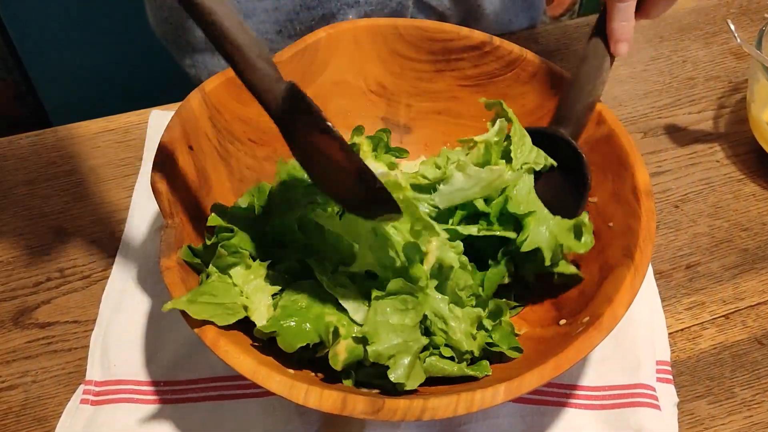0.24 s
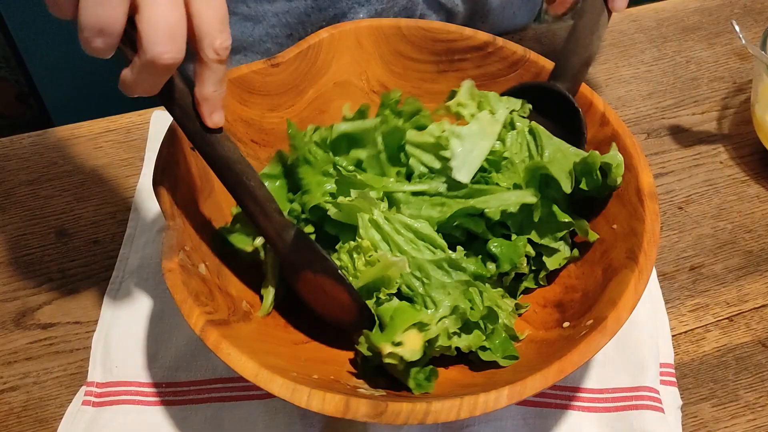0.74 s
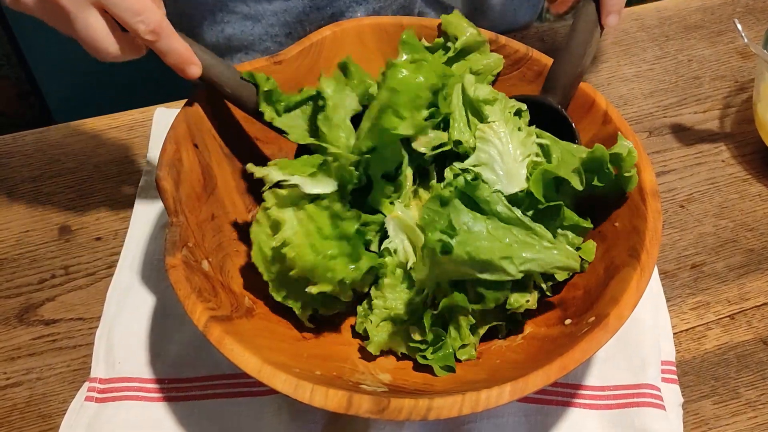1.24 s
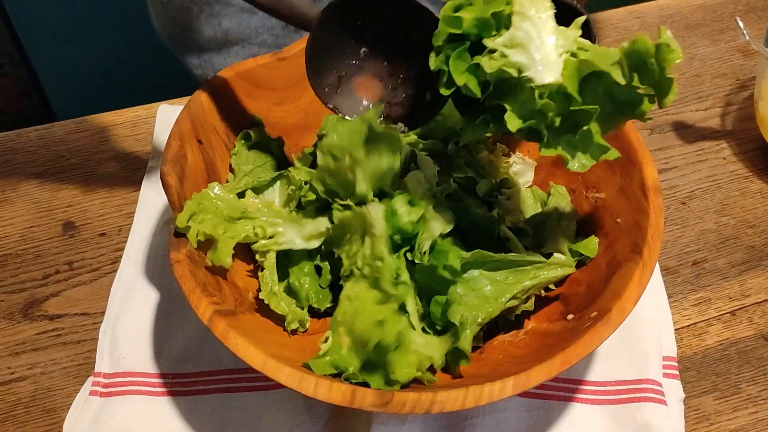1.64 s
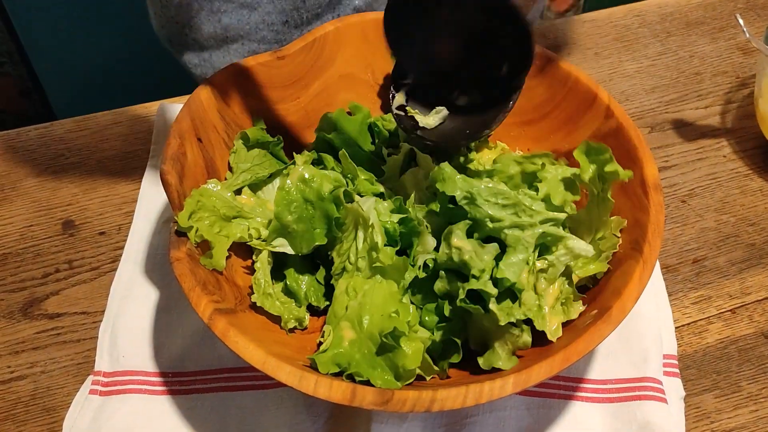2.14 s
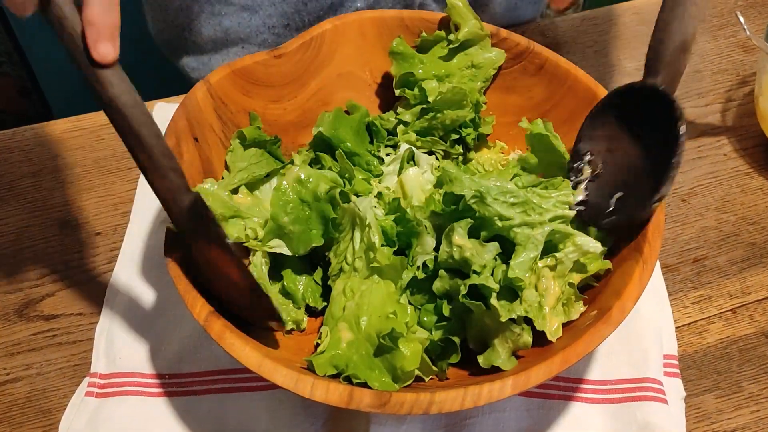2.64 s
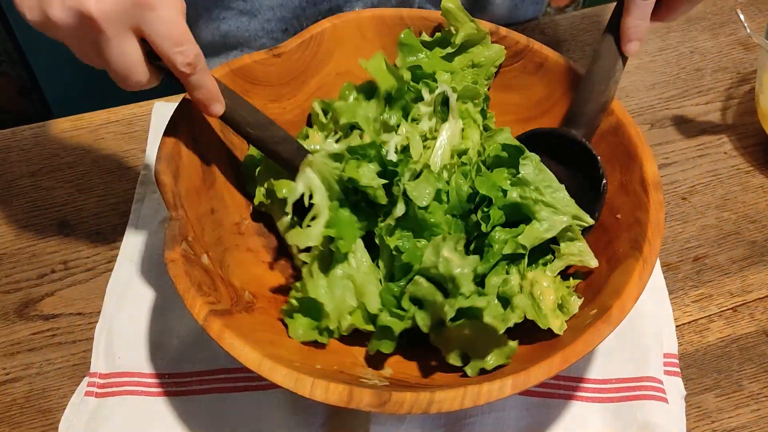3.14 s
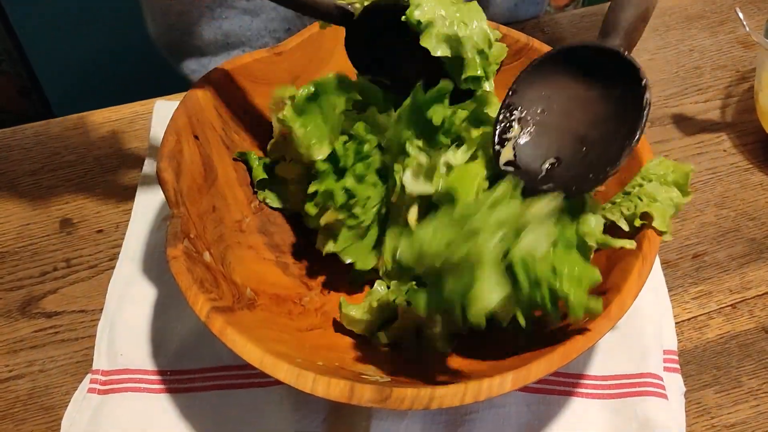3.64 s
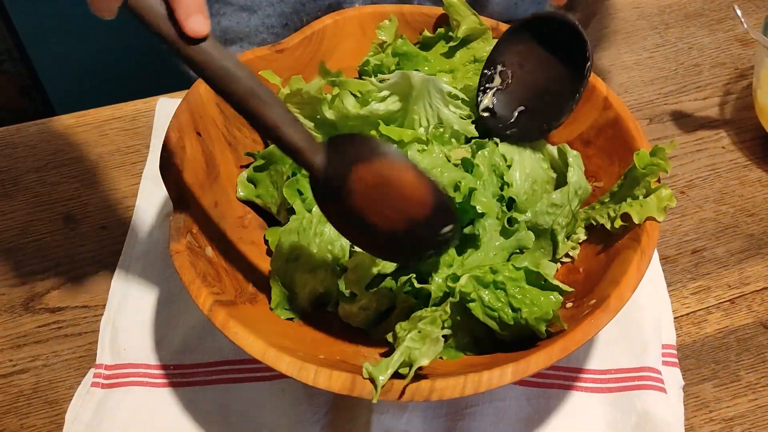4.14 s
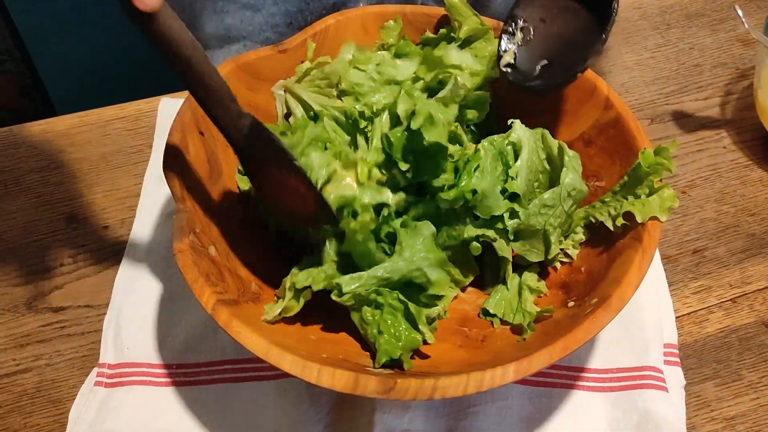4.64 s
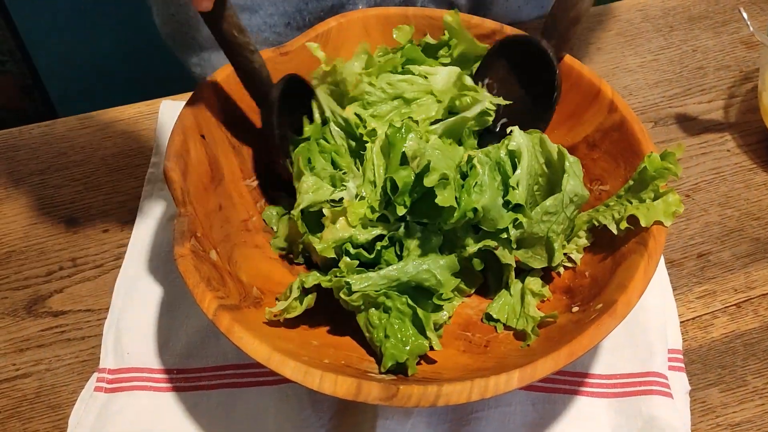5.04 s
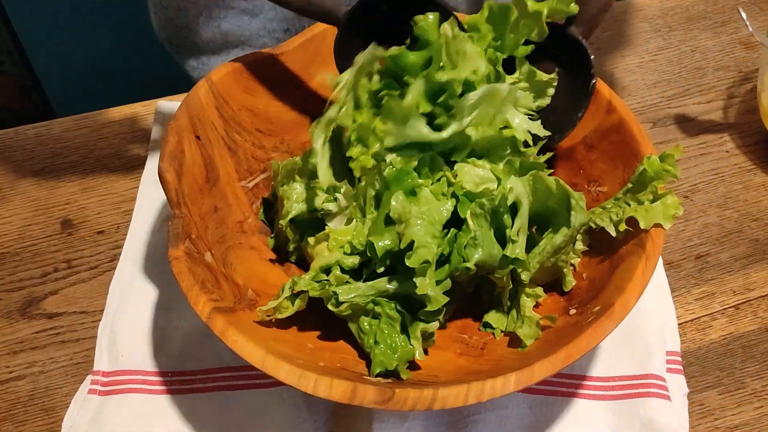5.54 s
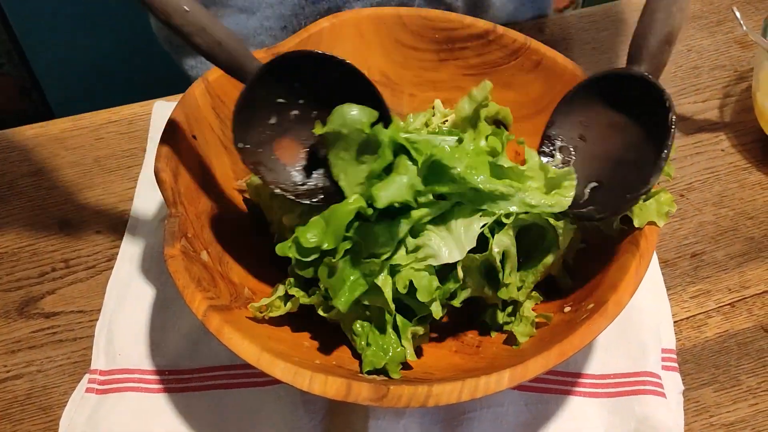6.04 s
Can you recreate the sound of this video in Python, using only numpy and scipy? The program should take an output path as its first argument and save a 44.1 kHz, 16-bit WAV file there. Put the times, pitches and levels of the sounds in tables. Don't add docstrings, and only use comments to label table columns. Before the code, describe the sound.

A quiet kitchen with faint low hum and hiss, heard close in stereo. Wet lettuce rustles very softly from the start, with a small tick near 0.2 s. At 0.63 s a server hits the bowl rim with a loud, bright wooden crack and low boom. Crisp sliding follows at 0.75 s, then tiny leaf snaps and cushioned bumps from 1.0 to 2.0 s. At 2.2 and 2.3 s the servers clap together, sharp and woody. A quick double knock on the bowl wall follows at 2.7 s, more hollow and leftward, trailed by rustling. From 3.0 to 4.7 s only faint ticks and leafy rubs are heard, strongest around 4.5 s. At 4.9 to 5.0 s a loud scoop and skid rattle in rapid succession, with weaker knocks closing the run. Soft rustles, muted bumps and ticks continue to 6.3 s. Knocks leave about half a second of reverberation.

```python
import sys
import numpy as np
from scipy import signal
from scipy.fft import rfft, irfft
from scipy.io import wavfile
from scipy.ndimage import uniform_filter1d

SR = 44100
rng = np.random.default_rng(int(sys.argv[2]) if len(sys.argv) > 2 else 0)


def gain_from_decibels(decibels):
    exponent = np.asarray(decibels, float) / 20
    return 10 ** exponent


def generate_wav(sig):
    pcm = np.round(np.clip(np.atleast_2d(sig).T, -1, 1) * 32767).astype(np.int16)
    wavfile.write(sys.argv[1], SR, pcm)


N = 277830

# mode_hz, width_hz, level_db
BOOM = [(144, 7.6, -11), (206.7, 10, -9), (263.9, 7.3, -5.5), (363, 10, -22.5), (499, 36, -10)]
HALF_BAND = 2 ** .25


def level(x, db):
    return x * gain_from_decibels(db) / np.sqrt(np.mean(x ** 2))


def band(x, lo_hz, hi_hz):
    sos = signal.butter(2, [lo_hz, min(hi_hz, .45 * SR)], "band", fs=SR, output="sos")
    return signal.sosfilt(sos, x)


def on_log(hz, table, axis=1):
    table = np.array(table, float)
    return np.interp(np.log(np.maximum(hz, 1)), np.log(table[:, 0]), table[:, axis])


def ring(modes, seconds, rise_s=0.0018, least_hz=50):
    t = np.arange(int(seconds * SR)) / SR
    y = np.zeros(len(t))
    for k, (hz, width_hz, db) in enumerate(modes):
        width_hz = max(width_hz, least_hz)
        decay = np.exp(-np.pi * width_hz * t)
        sign = (-1) ** k
        y += sign * gain_from_decibels(db) * width_hz * decay * np.sin(2 * np.pi * hz * t)
    y = y * (1 - np.exp(-t / rise_s)) ** 2
    return y / np.abs(y).max()


def crack(lo_hz, hi_hz, decay_s, rise_s=0.000067, snap=0):
    t = np.arange(900) / SR
    envelope = (1 - np.exp(-t / rise_s)) * np.exp(-t / decay_s)
    burst = rng.standard_normal(len(t)) * envelope
    y = band(burst + snap * signal.unit_impulse(len(t)), lo_hz, hi_hz)
    return y / np.abs(y).max()


def add(out, s, y, pan_db, wet_db=0):
    i = int(s * SR)
    y = y[:N - i]
    gains = gain_from_decibels(np.array([pan_db / 2, -pan_db / 2, wet_db]))
    out[:, i:i + len(y)] += np.outer(gains, y)


def walk(rate):
    k = int(SR / rate)
    steps = np.repeat(rng.standard_normal(N // k + 1), k)
    return uniform_filter1d(uniform_filter1d(steps, k), k)[:N]


def knocks():
    knock_s = [.6277, 2.2081, 2.2866, 2.7150, 2.7494, 4.9049, 4.9272, 4.9505, 4.9925]
    # peak_db, contact_crack_db, bowl_boom_db, left_minus_right_db, swell_s
    knock_levels = [
        (-8.5, 8.5, -13.5, -0.5, 0.00086),
        (-7.5, 5.5, -51, 2.5, 0.00047),
        (-5, -6.5, -29, 0, 0.0005),
        (-6.5, -22, -24.5, 7, 0.002),
        (-5.5, -7, -20, 6, 0.0025),
        (-4, -5, -28, 7, .002),
        (-2, -11.5, -34.5, -3.5, .0011),
        (-12, -31, -18.5, -3.5, 0.0012),
        (-20.5, -39, -41, 0.5, 0.000637),
    ]
    # dense_modes_db, crack_low_hz, crack_high_hz, room_db, crack_room_db
    shell_modes = [(-3, 3000, 11000, -4.5, -9), (-6, 3900, 13000, -3.5, -5), (-4.5, 3000, 9000, -10, -3.5),
                   (-8.5, 3100, 11000, -1, -5), (-4, 5900, 9400, -4.5, -10.5), (-7, 3100, 19000, -4.5, -7),
                   (-4.5, 7700, 8500, -7.5, -10), (-3.5, 3400, 11000, 4, -2), (0, 4800, 8800, 8, -1)]
    # mode_hz, width_hz, level_db
    rim = [(454, 44, -20.5), (824, 140, -17), (1426, 130, -8.5), (1521, 81, -0.5), (2080, 220, -25.5),
           (2382, 140, -12), (2730, 160, -19.5), (4210, 240, -37)]
    backs = [(353, 110, -8), (1020, 2100, -1.5), (1735, 210, -2.5), (2320, 400, 1), (3235, 320, -8),
             (4640, 580, -5.5)]
    server_edges = [(890, 150, -13.5), (1253, 200, -17), (1714, 49, -2), (2031, 140, -13.5),
                    (2300, 300, -10), (3000, 400, -24.5)]
    wall = [(480, 150, -17.5), (826, 41, -14), (1090, 310, -11), (1352, 57, -1), (1684, 49, -6),
            (1950, 120, -14.5), (2300, 70, -13.5), (2680, 280, -11), (3900, 500, -56)]
    bounce = [(813, 57, -3), (1136, 34, 1), (1426, 86, -0.5), (1613, 130, 6.5), (1890, 26, -6.5),
              (2110, 58, -10.5), (3730, 21, -30.5)]
    scoop = [(474, 83, -12), (840, 43, -11.5), (1451, 270, 7), (2016, 260, -4), (2467, 97, -11.5),
             (2916, 140, -11), (4230, 300, -31)]
    skid = [(813, 190, -1), (1310, 310, 5), (1805, 110, -2.5), (2640, 99, -8.5), (3500, 28, -19),
            (3830, 87, -14), (4060, 54, -26)]
    struck = [rim, backs, server_edges, wall, bounce, scoop, skid, scoop, skid]
    out = np.zeros((3, N))
    boom = ring(BOOM, 0.38, least_hz=12)
    for s, levels, modes, shell in zip(knock_s, knock_levels, struck, shell_modes):
        db, crack_db, boom_db, pan_db, swell_s = levels
        shell_db, crack_hz, top_hz, wet_db, crack_wet_db = shell
        wood = ring(modes, .12, swell_s, least_hz=65)
        dense = crack(428, 3530, decay_s=.0008, snap=22)
        contact = crack(crack_hz, top_hz, decay_s=.0005, snap=1.4)
        add(out, s, gain_from_decibels(db) * wood, pan_db, wet_db)
        add(out, s, gain_from_decibels(db + shell_db) * dense, pan_db, wet_db)
        add(out, s, gain_from_decibels(db + crack_db) * contact, pan_db, crack_wet_db)
        add(out, s, gain_from_decibels(db + boom_db) * boom, 0, wet_db - 1.5)
    return out


def bumps():
    # start_s, peak_db, ring_hz, boom_db, left_minus_right_db
    soft_bumps = [(0.184, -44, 320, -7, 7), (0.953, -41, 338, -4.5, 0.5), (1.229, -40, 380, -47, 0.0),
                  (1.42, -37.5, 930, -16.5, 0), (3.814, -46.5, 881, -8, -11), (5.388, -39.5, 330, 0, -6),
                  (5.404, -36, 328, -8, -16), (6.094, -36.5, 930, -10.5, 1), (6.108, -56, 323, -28, 0.5),
                  (6.29, -48.5, 502, 3.5, -29.5)]
    out = np.zeros((3, N))
    boom = ring(BOOM, 0.38, least_hz=12)
    for s, db, hz, boom_db, pan_db in soft_bumps:
        add(out, s, gain_from_decibels(db - 9.5) * ring([(hz, 0.33 * hz, 0)], .04), pan_db, -7)
        add(out, s, gain_from_decibels(db + boom_db - 0.5) * boom, 0, -7)
    return out


def thuds():
    # start_s, peak_db, ring_hz, left_minus_right_db
    rocking = [(0.6277, -33.5, 307, 0), (.628, -42.5, 84.6, -7.5), (2.716, -29.5, 204.4, 0.5),
               (2.716, -44, 58, -5), (4.543, -54.5, 91, -4), (4.982, -36.5, 138, -2), (5.389, -58, 54.3, 0),
               (6.089, -59.5, 118, -4), (6.29, -38, 172, -3.5)]
    out = np.zeros((3, N))
    for s, db, hz, pan_db in rocking:
        thud = ring([(hz, 18, 0)], 0.27, rise_s=.002, least_hz=8)
        add(out, s, gain_from_decibels(db + 2.5) * thud, pan_db, -8)
    return out


def ticks():
    # start_s, peak_db, centre_hz, treble_db
    snapping = [(0.185, -29, 3000, -11), (0.7789, -43, 1530, 15.5), (1.0216, -29.5, 2300, -12),
                (1.0466, -32, 1930, -6.5), (1.1487, -26, 3600, -13.5), (1.1894, -35, 1690, -31),
                (1.286, -37.5, 2250, 4), (1.3678, -35.5, 1290, -20.5), (1.4346, -38, 1500, -23),
                (1.4915, -48.5, 1565, 4.5), (1.7164, -32, 2805, -11.5), (1.9751, -48, 1603, -40),
                (2.145, -46.5, 1288, -28.5), (3.059, -37.5, 1650, -20), (3.2804, -41, 1500, -14),
                (3.5718, -44, 1700, -28), (3.8142, -36, 2295, -12), (3.9982, -47, 1670, -22.5),
                (4.202, -46.5, 2960, -2.5), (4.3847, -39.5, 1720, -20.5), (4.439, -31, 2730, -8),
                (4.5374, -30, 2830, -20), (4.6149, -35.5, 2770, -10.5), (5.2833, -33.5, 3600, 1.5),
                (5.2982, -41, 2320, 3.2), (5.4485, -44.5, 3600, 2.5), (6.0044, -49, 2910, -28.5),
                (6.111, -41, 1510, -5), (6.291, -40, 2500, -9), (3.153, -37.5, 1470, -29)]
    decay_s, rise_s = .0022, .0009
    out = np.zeros((3, N))
    for s, db, hz, treble_db in snapping:
        pan_db = -1.5 + 6.5 * rng.standard_normal()
        body = crack(.6 * hz, 2.4 * hz, decay_s, rise_s)
        treble = crack(5000, 16000, decay_s, rise_s)
        add(out, s, gain_from_decibels(db - 10.0) * body, pan_db, -8)
        add(out, s, gain_from_decibels(db + treble_db) * treble, pan_db, -8)
    return out


def rustle():
    # time_s, level_db
    handling = [(0, -64), (.15, -76), (.3, -65), (.6, -67), (.95, -64.5), (1.56, -63), (1.67, -74.5),
                (1.85, -87.5), (2.15, -83.5), (3.22, -71), (3.52, -66), (4.1, -71), (4.28, -85),
                (4.75, -69.5), (4.88, -85), (5.4, -67.5), (5.6, -80), (6.3, -84)]
    # peak_s, crisp_db, dull_re_crisp_db, rise_s, fall_s
    rubs = [(.187, -51, -2.5, .004, 0.011), (.74, -47, -3.5, 0.025, 0.067), (1.035, -56, 1.5, 0.036, 0.036),
            (1.29, -71.5, 8.5, 0.0076, 0.017), (1.722, -57.5, 3.5, 0.018, 0.019),
            (1.982, -59, 0, .01, 0.022), (2.086, -63, 4, .03, 0.015), (2.85, -48, 1.5, .05, 0.14),
            (3.814, -55.5, -3, .005, 0.029), (4.012, -67.5, -3.5, 0.0198, 0.0294),
            (4.2, -71.5, 8.5, 0.0054, 0.0165), (4.47, -61, -1, 0.047, 0.032),
            (4.535, -48.5, -5, 0.038, .03), (4.618, -52, -7, 0.0069, .012), (5.0, -49.5, 1, 0.02, 0.17),
            (5.15, -62, 4.5, 0.08, .07), (5.3, -65.5, 8.5, .015, .03), (5.78, -78.5, 5, .01, .04),
            (6.006, -68.5, 6, .008, 0.0055), (6.098, -65, 8, 0.0062, 0.0072)]
    t = np.arange(N) / SR
    high = gain_from_decibels(np.interp(t, *np.transpose(handling)))
    low = high * gain_from_decibels(0.1)
    for s, db, dull_db, rise_s, fall_s in rubs:
        pull = gain_from_decibels(db) * np.exp(-np.abs(t - s) / np.where(t < s, rise_s, fall_s))
        high = high + pull
        low = low + pull * gain_from_decibels(dull_db)
    sizes = gain_from_decibels(np.minimum(11.0 * rng.exponential(size=(3, N)), 9))
    snaps = (rng.random((3, N)) < .06) * rng.standard_normal((3, N)) * sizes
    snaps = level(snaps, 0) + gain_from_decibels(-16) * rng.standard_normal((3, N))
    snaps = snaps + 0.29 * snaps[2]
    crisp = level(band(snaps, 4200, 15000), -1.5) * gain_from_decibels(2.0 * walk(30))
    crunch = (rng.random(N) < .006) * rng.standard_normal(N)
    dull = level(band(snaps + level(crunch, -1.0), 620, 2900), -2) * gain_from_decibels(3.5 * walk(45))
    return (high * crisp + low * dull) * gain_from_decibels(np.array([[0], [0], [-4]]))


def room(x):
    # delay_s, left_db, right_db, top_hz
    echoes = [(.0015, -6, -30, 8850), (.0032, -13, -1, 2500), (0.0102, -4.5, -10.5, 12000),
              (0.0165, -15, -3, 3000), (.021, -13, -4.5, 3000)]
    # band_hz, decay_s
    room_t60 = [(100, 0.95), (260, 0.69), (700, 0.57), (1840, 0.49), (4850, 0.38), (12800, 0.22)]
    t = np.arange(int(.9 * SR)) / SR
    tail = 0
    for hz in 70 * 2 ** np.arange(0, 8, .5):
        mid, side = band(rng.standard_normal((2, len(t))), hz / HALF_BAND, hz * HALF_BAND)
        spread = min(hz / 1800, 1) ** .5
        pair = mid + spread * side * np.array([[1], [-1]])
        tail = tail + pair * gain_from_decibels(-60 * t / on_log(hz, room_t60))
    tail = tail * (1 - np.exp(-(t / .009) ** 2))
    tail = tail * gain_from_decibels(-0.5) / np.sqrt(np.sum(tail ** 2) / 2)
    for s, left_db, right_db, top_hz in echoes:
        dull = band(signal.unit_impulse(200), 60, top_hz)
        i = int(s * SR)
        tail[:, i:i + len(dull)] += np.outer(gain_from_decibels(np.array([left_db, right_db])), dull)
    return signal.fftconvolve(tail, x[None], axes=1)[:, :N]


def kitchen():
    # band_hz, level_db (per Hz)
    house_noise = [(18, -77.5), (30, -43.5), (76, -3.5), (196, -1.5), (248, -11.5), (276, -3.5), (506, -13),
                   (577, -17), (1030, -17.5), (2470, -24.5), (4770, -29.5), (8530, -43), (15200, -23),
                   (16500, -43)]
    out, swell = 0, walk(0.66)
    for hz in 28 * 2 ** np.arange(0, 9.4, .5):
        mid, side = band(rng.standard_normal((2, N)), hz / HALF_BAND, hz * HALF_BAND)
        db = on_log(hz, house_noise) + 1.0 * swell + 0.57 * walk(3.6)
        spread = min(0.55 + hz / 6000, 1)
        out = out + gain_from_decibels(db) * (mid + spread * side * np.array([[1], [-1]]))
    return level(out, -62)


def scene():
    near = knocks() + bumps() + thuds() + ticks() + rustle()
    return near[:2] + room(near[2]) + kitchen()


def roll_off(x):
    return signal.sosfilt(signal.butter(12, 16000, fs=SR, output="sos"), x)


def record(dry):
    # band_hz, level_db, left_minus_right_db
    port_response = [(60, -2, 0.5), (930, 2.5, 0), (2500, 3, 3.5), (3600, 3.5, 3.5), (4340, 5, 1),
                     (4900, 0.5, 3), (6400, 0.5, 9), (7470, -2, 6.5), (8780, 4, 10.5), (10400, -2.5, 10),
                     (11200, -6, -9), (12000, 2, -2), (12500, -2.5, -1.5), (15200, -8.5, -9.5),
                     (16200, -17.5, 0)]
    hz = np.arange(513) * SR / 1024
    db = on_log(hz, port_response)
    db = db + np.array([[.5], [-.5]]) * on_log(hz, port_response, axis=2)
    cepstrum = irfft(np.log(gain_from_decibels(db)))
    cepstrum[:, 1:512] *= 2
    cepstrum[:, 513:] = 0
    ports = irfft(np.exp(rfft(cepstrum)))
    ports[1] = np.roll(ports[1], 3)
    heard = signal.fftconvolve(dry, ports, axes=1)[:, :N]
    heard = signal.sosfilt(signal.butter(2, 42, "high", fs=SR, output="sos"), heard)
    return roll_off(np.tanh(1.05 * heard) / 1.05)


dry = scene()
out = record(dry)
generate_wav(out)
```